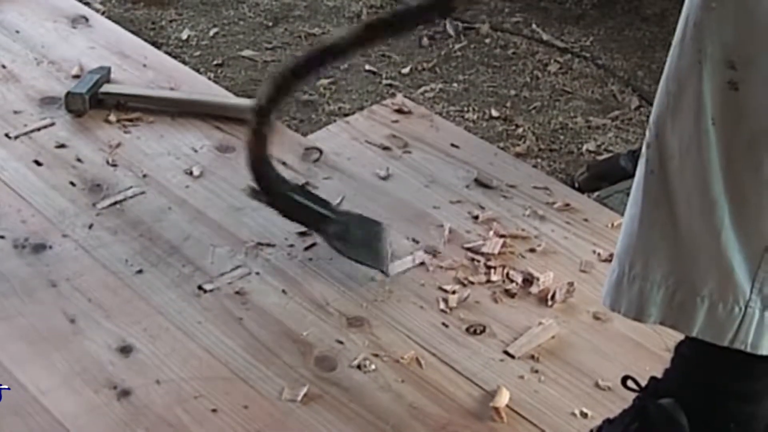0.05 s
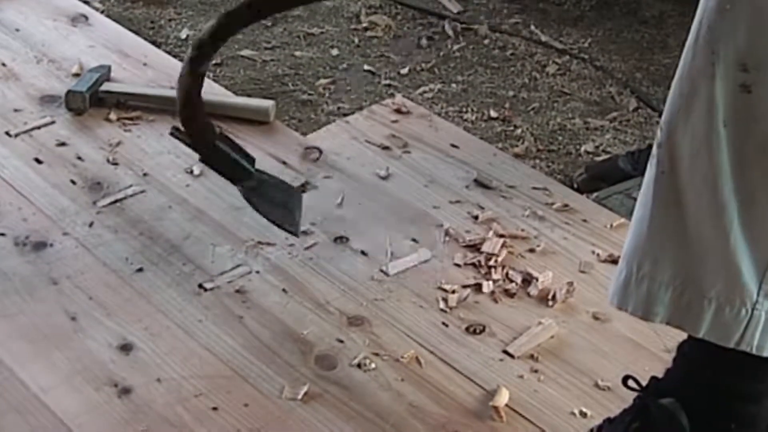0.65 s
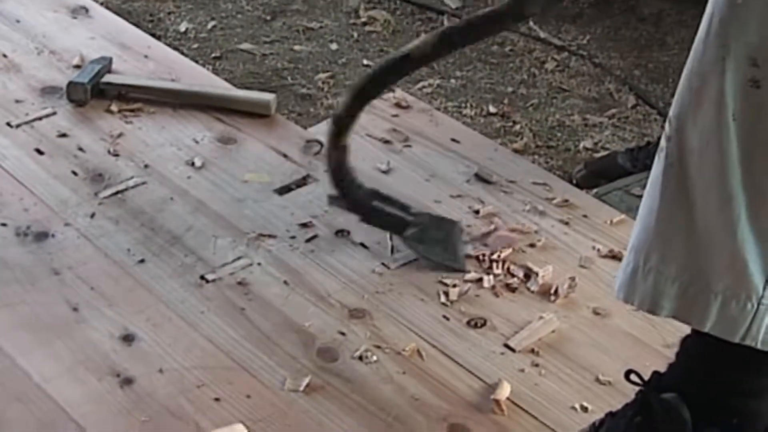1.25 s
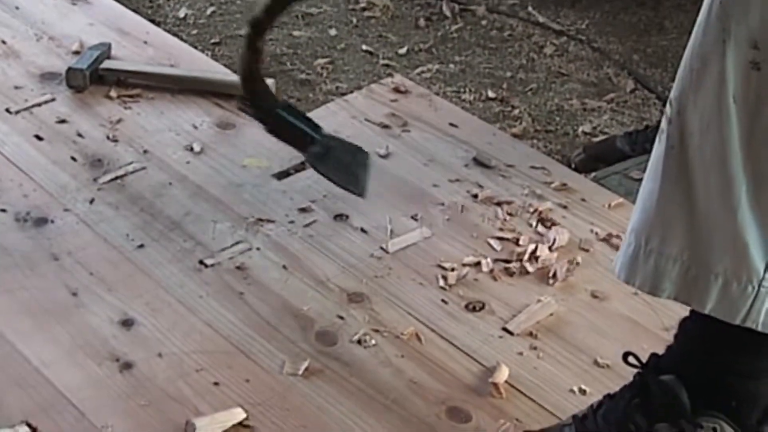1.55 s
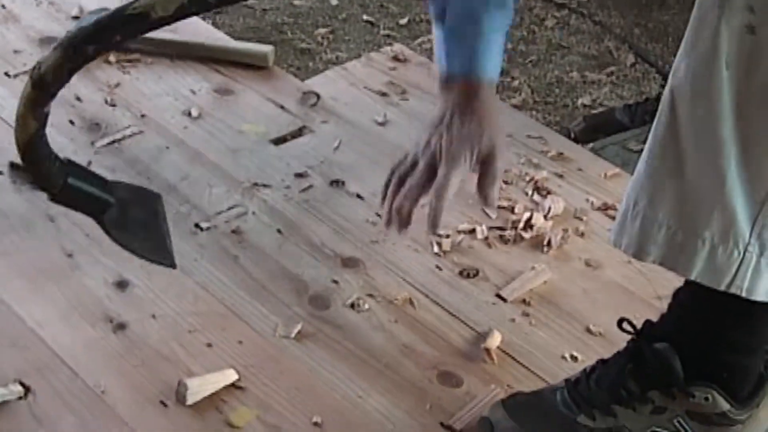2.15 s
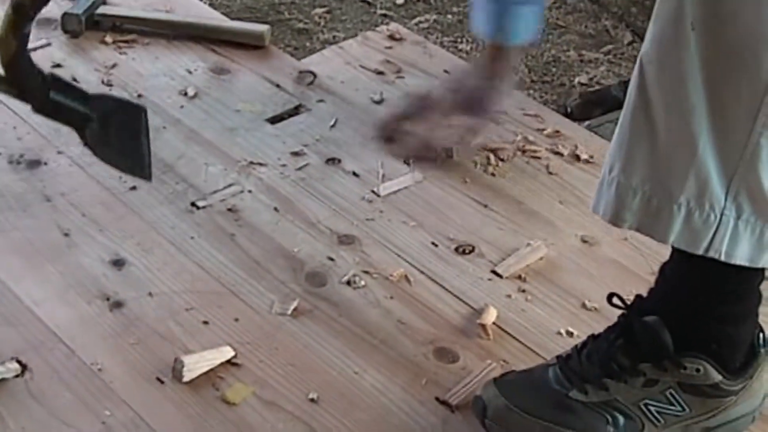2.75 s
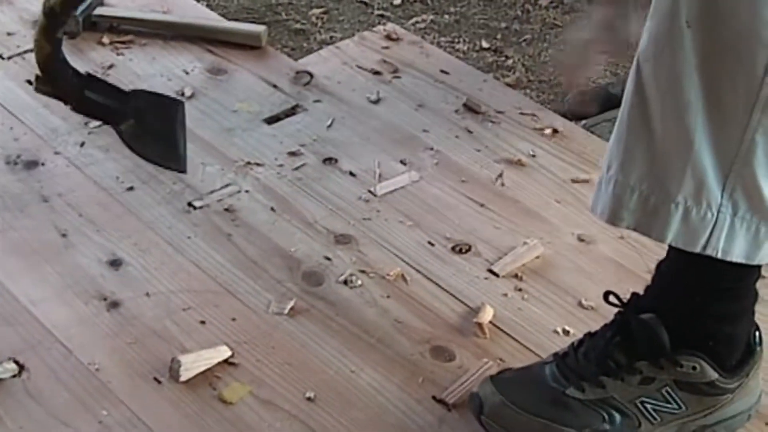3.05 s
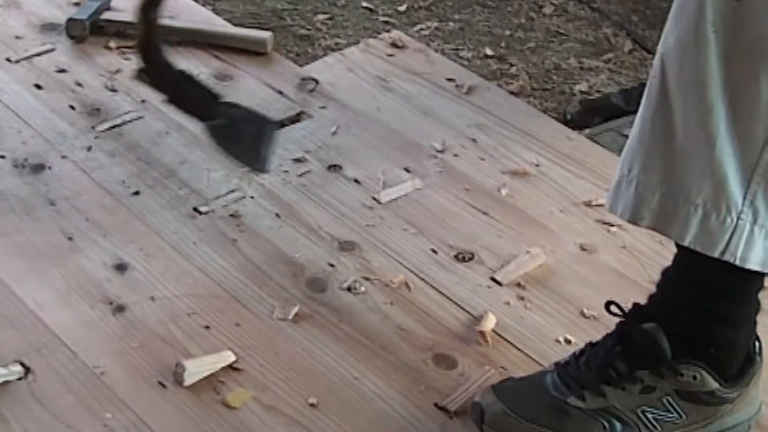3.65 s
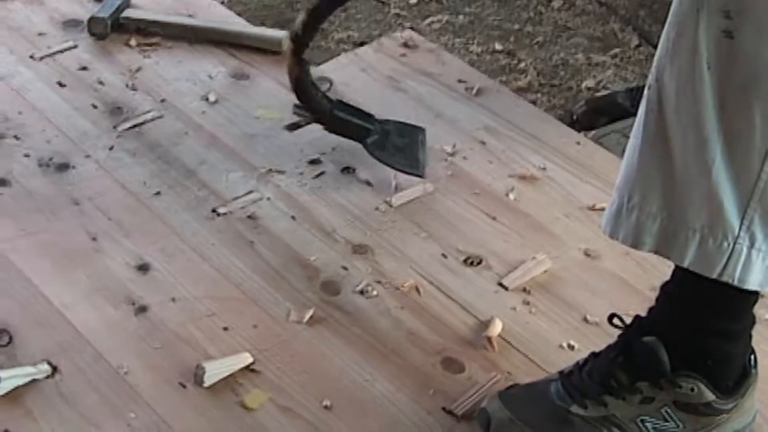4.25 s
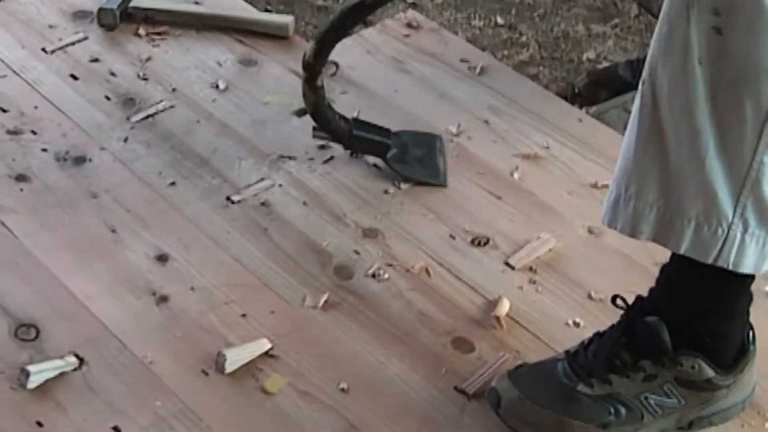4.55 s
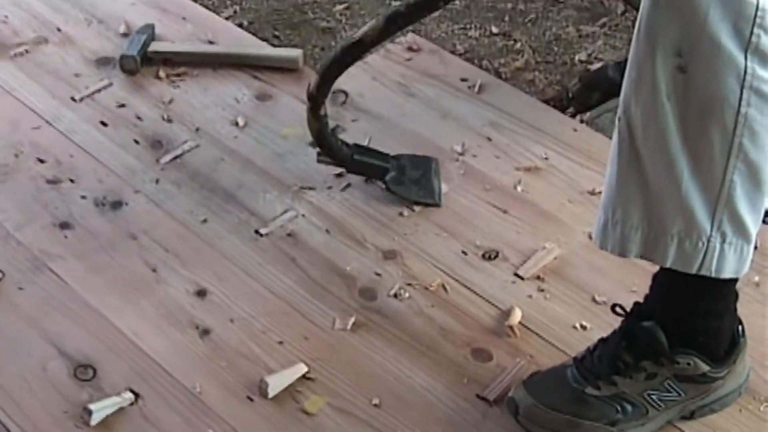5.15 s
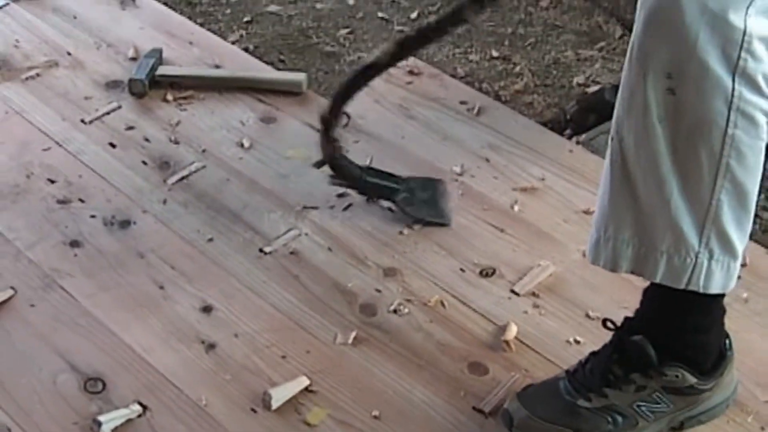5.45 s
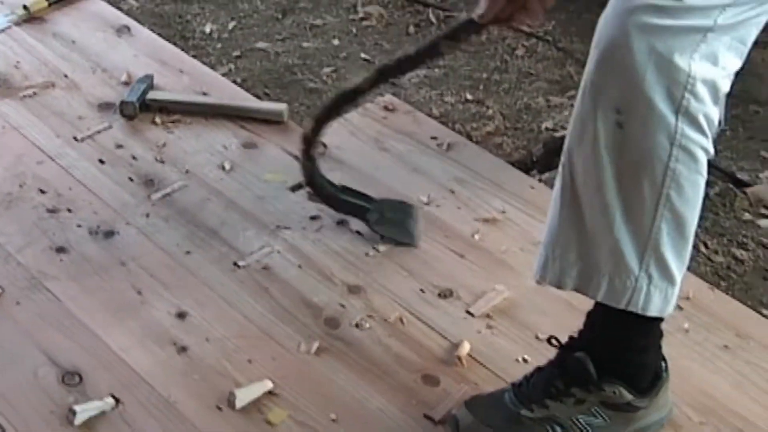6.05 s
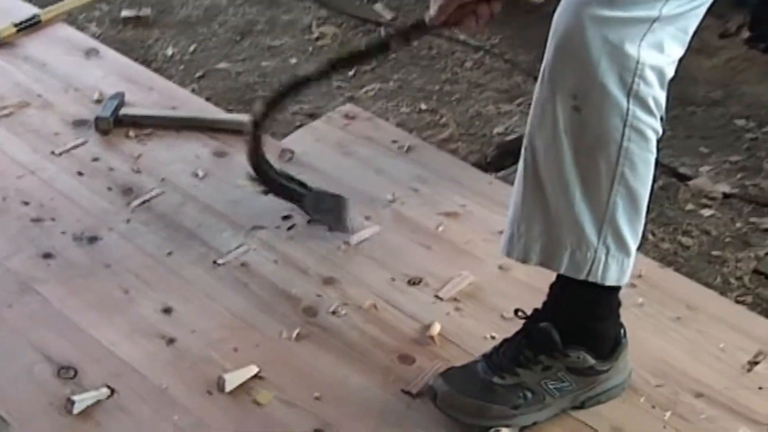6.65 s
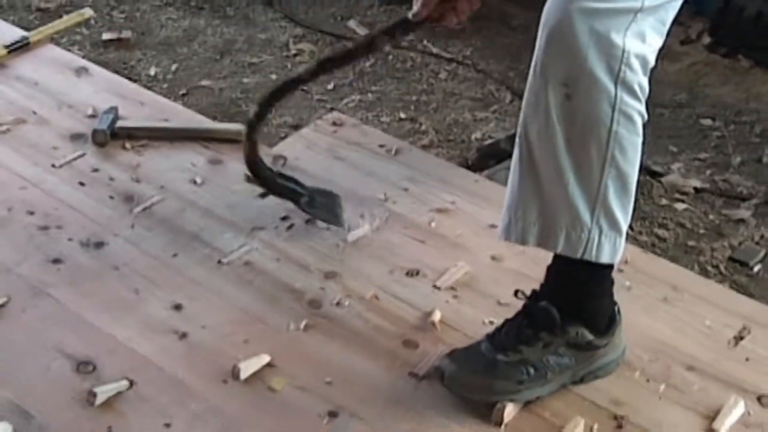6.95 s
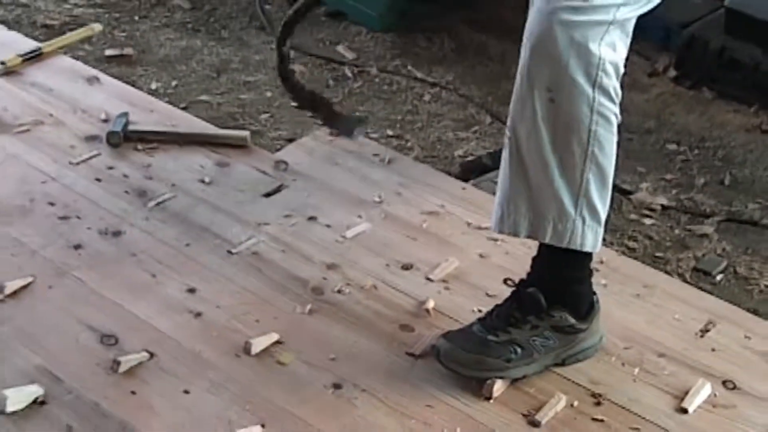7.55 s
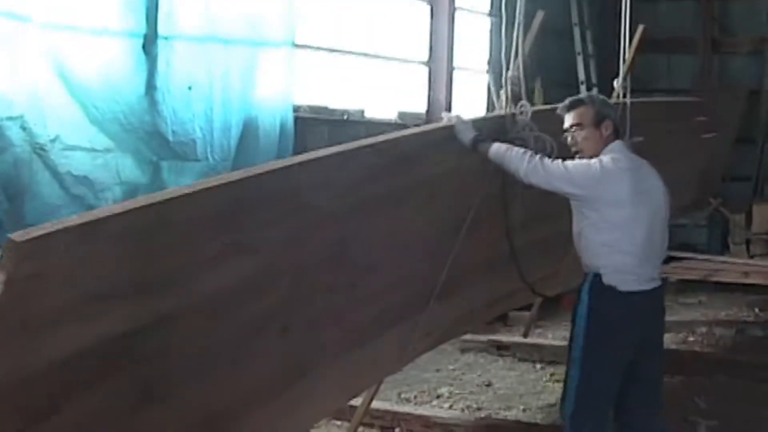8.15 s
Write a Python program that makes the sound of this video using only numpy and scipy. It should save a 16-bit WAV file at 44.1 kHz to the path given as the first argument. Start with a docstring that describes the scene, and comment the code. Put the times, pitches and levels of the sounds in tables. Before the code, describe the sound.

An adze chops a plank deck close to a stereo microphone in a big wooden shed. Each blow cracks fibres and thumps the ringing boards, often followed by a lighter clack as the blade drops back. After a few blows, a hand sweeps chips away while someone knocks on timber further off. Five more blows and a sharp knock follow, then the sound switches to a low drone with one scraping swish.

```python
"""A big wooden boat shed, a stereo microphone near a deck of planks being chopped with an adze.
Each blow snaps fibres and thumps the boards, the blade drops back on them, and the shed rings on.
In a pause a hand sweeps the chips away; further off, someone knocks on timber.
Clothes rustle over a faint room tone. At the end the scene cuts to another place:
a steady drone and one scraping swish, a tool rubbing along a hull plank."""
import sys
import numpy as np
from scipy import signal
from scipy.fft import rfft, irfft, next_fast_len
from scipy.io import wavfile

SR = 44100
rng = np.random.default_rng(int(sys.argv[2]) if len(sys.argv) > 2 else 0)


def master_out(mix):
    """Clip the mix to full scale and print it as 16-bit PCM to the path in sys.argv[1]."""
    frames = np.transpose(np.atleast_2d(mix))
    ceiling = np.clip(frames, -1, 1)
    pcm = np.round(ceiling * 32767).astype(np.int16)
    wavfile.write(sys.argv[1], SR, pcm)


N = 366471
TIME = np.arange(N) / SR

# adze blows: start_s, thump_db, contact_ms, crack_db, snap_db, boom_db, bright_db, ping_db
BLOWS = [(-0.13, 0, 1.0, -14, -7, -16, -3.5, -6), (0.3206, -1.5, 1.7, -12, -10.5, -15.5, -5.5, -12),
         (0.786, -6.5, 0.35, -14.5, -8.5, -14, 2, -16), (1.2480, -2.5, 0.81, -20, -12.5, -15, -9.5, -15),
         (5.4750, -2.5, 1.59, -19.5, -21.5, -20.5, -11.5, -19),
         (5.9159, -3.5, 1.2, -23, -24.5, -17.5, -9.5, -33), (6.3129, -2, 1.38, -25.5, -28.5, -18, -10, -38),
         (6.7125, -1.5, 0.41, -6.5, -19.5, -13, 0.5, -29), (7.1618, -6, 1.6, -4.5, -25.5, -15, 2, -33)]
# blade dropping back, or a palm landing: start_s, thump_db, contact_ms, clack_db, boom_db
LIGHT_CONTACTS = [(0.357, -11.5, 1.5, -19.5, -25.5), (0.44, -7, 2.5, -23, -34),
                  (0.895, 1.5, 1.85, -19, -18), (1.337, -5.5, 0.71, -19, -28.5),
                  (1.345, -0.5, 0.6, -12.5, -24.5), (2.374, -25, 0.86, -21, -31),
                  (2.829, -38, 3.4, -36.5, -39), (3.277, -38, 0.98, -37.5, -40.5),
                  (5.547, -9, 0.73, -20, -29), (6.029, -16, 1.1, -24, -41), (6.806, -7.5, 0.29, -16, -39),
                  (7.257, -7, 1.2, -20, -27.5)]
# larger chips landing and snapping: start_s, tick_db, rattle_db
CHIP_FALLS = [(0.407, -14, -17), (0.6027, -21, -25), (1.6148, -21.5, -33), (2.627, -18.5, -28),
              (2.865, -11.5, -17.5), (3.2164, -29.5, -46), (3.441, -20, -36), (3.6445, -24, -35),
              (3.671, -19, -28.5), (4.0453, -23.5, -33), (4.8635, -34, -37)]
# shavings peeling off and skittering: start_s, length_s, level_db
SHAVING_SLIDES = [(0.387, 0.16, -33), (1.325, 0.073, -32), (2.599, 0.086, -27), (3.677, 0.14, -45),
                  (5.544, 0.034, -37), (5.992, 0.28, -34), (6.185, 0.25, -70), (6.785, 0.065, -39)]
# hand strokes through the chips: fastest_s, length_s, hiss_db, rub_db
HAND_STROKES = [(2.361, 0.23, -29.5, -41.5), (2.843, 0.21, -35, -48), (3.379, 0.26, -35, -48.5)]
# knocks across the shed: start_s, level_db, tilt_db_per_octave, dull_hz, direct_db, echo_db, pitches_hz
FAR_KNOCKS = [(1.669, -31.5, -1.5, 1500, 0, -1.5, (740, 1000, 1325)),
              (2.061, -24.5, -1.5, 3800, -5, -0.5, (422, 483, 670, 873, 1177, 1575)),
              (4.428, -27.5, -3, 2960, 0.5, 3.5, (554, 715, 838, 892, 1090, 1685)),
              (4.721, -28, -1.5, 4500, 1, 4, (613, 697, 1119, 1275, 1557)),
              (7.378, -15, 5, 8000, -1.5, -18, (623, 932, 1060, 1157, 1248, 1356))]
# trousers and shoes: start_s, length_s, swish_db, rustle_db, scuff_db
STANCE_SHIFTS = [(1.299, 1, -57.5, -68, -64), (3.615, 0.21, -59, -66, -49.5), (3.721, 0.75, -57, -74, -66),
                 (4.199, 0.29, -61, -57.5, -79), (5.001, 0.39, -65, -55.5, -75),
                 (6.621, 0.23, -76, -73, -45.5), (6.979, 0.16, -62, -54, -45)]
# thin, far whistles: start_s, length_s, pitch_hz, level_db
FAR_WHISTLES = [(1.075, 0.077, 5170, -63), (7.786, 0.078, 5300, -60)]

# modes of the flexing boards and the steel blade: pitch_hz, level_db, t60_s
BOARD_MODES = [(470, 4.5, 0.0032), (218, -5, 0.028), (640, -5.5, 0.015), (142, -16, 0.081),
               (1110, -35, 0.0099)]
BLADE_MODES = [(3850, -33, 0.39), (6400, -29.5, 0.33), (6360, -31, .22), (7800, -38, 0.13),
               (9920, -33, .12)]
# lasting resonances of the deck: pitch_hz, width_hz, lift_db
DECK_PEAKS = [(225, 35, 8), (286.2, 10.4, 11.5), (408, 7.3, 4.5), (497, 23, -2.5), (561, 27, 7),
              (614, 86, 2), (780, 23, 1), (858, 4.5, 5), (1110, 19, 4.5), (1590, 24, 1), (2390, 46, -22),
              (3000, 140, 8), (3800, 150, 7)]
# decay of deck and shed together: band_hz, t60_s
SHED_DECAY = [(90, 1.16), (220, 1.054), (560, 1.18), (1400, 0.93), (3500, 0.69), (8000, 0.47),
              (16000, 0.55)]
# stereo width at the microphone: band_hz, side_minus_mid_db
STEREO_WIDTH = [(30, -10), (70, -23), (170, -55), (350, -37.5), (700, -23.5), (1400, -17), (2800, -12),
                (5600, -9.5), (9000, -3), (14000, 10.5)]

# noise spectra at the microphone: frequency_hz, density_db
DECK_BOOM = [(30, -33), (65, -32), (90, -5.5), (130, -5.5), (230, -4), (340, -6.5), (480, -3), (640, -8),
             (850, -7.5), (1200, -16), (2000, -25.5), (3500, -40.5), (5000, -42), (16000, -69)]
WOOD_CRACK = [(300, -23), (800, 10.5), (1400, 2), (2500, -2), (4000, -18), (5000, -21), (16000, -46)]
FIBRE_SNAP = [(1000, -3.5), (3000, -1), (4200, -5), (4900, -11), (6400, 1), (8200, 2.5), (10000, -5.5),
              (12000, -16), (16000, -21.5)]
HOLLOW_CLACK = [(100, -18), (350, -23), (560, 14.5), (720, -5), (1000, -7.5), (1600, -18), (3000, -31),
                (5000, -39), (16000, -46)]
CHIP_BRUSH = [(710, -26), (1200, -22), (1430, -10), (1770, -6.5), (2230, -5.5), (2530, -9.5), (4040, -3.5),
              (4600, -8.5), (6370, -1), (7820, 0.5), (10300, -5), (16000, -24.5)]
HULL_DRONE = [(29, -34), (50, 6), (70, -20), (140, 4.5), (211, -4.5), (318, 3), (411, -1.5), (497, 2.5),
              (775, -1), (844, -0.5), (1650, -11), (2530, -24), (2800, -39), (3000, -46), (3900, -52),
              (6600, -120)]
TOOL_SCRAPE = [(1180, -4.5), (2000, 0), (4010, -1.5), (4450, -10), (4820, -8), (6040, -13.5), (9490, -11),
               (14800, -39), (15600, -40), (16000, -85)]
TIMBER_KNOCK = [(40, -13.5), (100, -1.5), (250, 0.5), (400, 0), (580, 2), (850, 1.5), (1050, -2),
                (1300, -4), (2000, -8), (3500, -19.5), (5000, -34), (9000, -40), (16000, -83)]
CLOTH_RUSTLE = [(700, -8), (2000, -1), (3000, -1), (4000, 6), (4800, -10), (7000, -11), (10000, -13),
                (14000, -17), (16000, -21)]
SOFT_HISS = [(1500, -22), (2800, -6), (4100, 2.5), (4700, -12), (6000, -3), (8300, 0), (10000, -4.5),
             (12500, -11), (16000, -29)]
ROOM_HUM = [(18, -14), (30, -3), (80, -2), (249, -3.5), (277, 2.5), (327, -3.5), (468, -4), (509, -3),
            (995, -10), (1080, -8), (1360, -11.5), (2780, -16.5), (4500, -23.5), (5850, -21.5),
            (9900, -120)]


def adze(size=65536, bite_lead_s=0.0024, bass_start_db=3.5, bass_db_per_s=-1.1):
    """Near the microphone: the edge bites, fibres snap, boards thump, steel pings, the shed answers."""
    out, t = np.zeros((2, N)), TIME[:size]
    same_spot = rng.standard_normal((2, size))  # blows land close together and share much of their ring
    for s, thump_db, contact_ms, crack_db, snap_db, boom_db, bright_db, ping_db in BLOWS:
        add(out, s - bite_lead_s, from_db(snap_db - 17) * burst(FIBRE_SNAP, t60=0.017, width_db=3))
        add(out, s, from_db(thump_db + 5.5) * thump(contact_ms))
        add(out, s, from_db(crack_db) * burst(WOOD_CRACK, t60=0.035, width_db=-6.5))
        add(out, s, from_db(snap_db) * burst(FIBRE_SNAP, t60=0.015, width_db=-5, rise_s=0.0001))
        ping = sum(from_db(db + rng.normal(0, 1)) * np.sin(2 * np.pi * hz * t) * fade(t, t60)
                   for hz, db, t60 in BLADE_MODES)
        add(out, s, from_db(ping_db) * ping)
        bass_db = bass_start_db + bass_db_per_s * s  # less deep as the work moves along the deck
        add(out, s, from_db(boom_db) * boom(bright_db, build_s=0.0012, common=same_spot, bass_db=bass_db))
        wash = noise(FIBRE_SNAP, size, grain_db=4.5) * fade(t, 0.49)  # treble returned by the shed
        add(out, s, from_db(0.87 * snap_db - 28) * wash)
    return out


def thump(contact_ms, return_s=0.00433, return_db=-1.5):
    """A half-sine push bends the boards; the bending wave comes back once from their far edge."""
    t = TIME[:8192]
    push = np.sin(np.pi * np.minimum(t * 1000 / contact_ms, 1))
    modes = sum((-1) ** k * from_db(db) * np.sin(2 * np.pi * hz * t) * fade(t, t60)
                for k, (hz, db, t60) in enumerate(BOARD_MODES))
    flex = signal.fftconvolve(push / push.sum(), modes)[:len(t)]
    return flex + from_db(return_db) * np.interp(t - return_s, t, flex, left=0)


def boom(bright_db, build_s, common=0, bass_db=0, bright_hz=900, bass_hz=126):
    """The whole deck rings on in the shed; a harder blow wakes more of its upper modes."""
    def colour(hz):
        treble_shelf = bright_db * hz ** 4 / (hz ** 4 + bright_hz ** 4)
        bass_shelf = bass_db / (1 + (hz / bass_hz) ** 4)
        return resonances(DECK_PEAKS, hz) + treble_shelf + bass_shelf
    ring = shed_ring(DECK_BOOM, colour, common)
    return ring * (1 - np.exp(-TIME[:ring.shape[1]] / build_s))


def bumps():
    """Blade or palm lands lightly on the deck: a small thump, a hollow clack and a brief ring."""
    out = np.zeros((2, N))
    for s, thump_db, contact_ms, clack_db, boom_db in LIGHT_CONTACTS:
        add(out, s, from_db(thump_db - 1) * thump(contact_ms))
        add(out, s, from_db(clack_db) * burst(HOLLOW_CLACK, t60=0.13, width_db=-18, rise_s=0.00051))
        ring = boom(bright_db=-15, build_s=0.00077)
        add(out, s, from_db(boom_db) * ring * fade(TIME[:ring.shape[1]], 1.0))
    return out


def chips():
    """Single chips tick on the deck; shavings rustle and slide to rest."""
    out = np.zeros((2, N))
    for s, tick_db, rattle_db in CHIP_FALLS:
        add(out, s, from_db(tick_db - 10) * burst(FIBRE_SNAP, t60=0.017, width_db=-6, grain_db=5.5))
        add(out, s, from_db(rattle_db - 15) * burst(FIBRE_SNAP, t60=0.097, width_db=-1, grain_db=3.5))
    for s, length, db in SHAVING_SLIDES:
        t = TIME[:int(2 * length * SR)]
        slide = fade(t, 2 * length, rise_s=0.18 * length)
        add(out, s, from_db(db - 1.5) * noise(CHIP_BRUSH, len(t), grain_db=3.5) * slide)
    return out


def hand_sweep(catch_db=2.5, catches_per_s=140, ticks_per_s=90, press_lag_s=0.031):
    """A palm drags dry chips over the grain; they catch and slip above a dull rub, then tumble to rest."""
    hiss = sum(from_db(db) * stroke(s, length) for s, length, db, _ in HAND_STROKES)
    rub = sum(from_db(db) * stroke(s + press_lag_s, length) for s, length, _, db in HAND_STROKES)
    tumbling = sum(from_db(db - 15.5) * fade(TIME - s, t60=1.66) for s, _, db, _ in HAND_STROKES)
    landings = (rng.random(N) < ticks_per_s / SR) * rng.random(N)
    tick = fade(TIME[:4096], 0.015) + from_db(-12) * fade(TIME[:4096], 0.17)
    ticks = rms_one(signal.fftconvolve(landings, tick)[:N])
    moments = np.arange(0, TIME[-1], 1 / catches_per_s)
    grip = np.interp(TIME, moments, rng.standard_normal(N)[:len(moments)])
    catching = rms_one(from_db(catch_db * grip))
    crackle = np.hypot(catching * hiss, tumbling * ticks) * noise(CHIP_BRUSH, grain_db=2.5)
    return crackle + catching * rub * noise(WOOD_CRACK, grain_db=3)


def hull_rub(cut_s=7.745, rise_s=0.025, push_s=8.22, push_length_s=0.22, plank_lag_s=0.068):
    """Another place, after the cut: a rubbed plank drones steadily, with one scraping swish."""
    fade_in = 1 - np.exp(-np.maximum(TIME - cut_s, 0) / rise_s)
    drone = from_db(-32.5) + from_db(-38) * stroke(push_s + plank_lag_s, push_length_s)
    hiss = from_db(-49.5) + from_db(-38) * stroke(push_s, push_length_s)
    return fade_in * (drone * noise(HULL_DRONE) + hiss * noise(TOOL_SCRAPE, grain_db=3.5))


def far_knocks(echo_s=0.02, rise_s=0.0008, build_s=0.042, peak_width_hz=34, peak_db=12):
    """Across the shed, timber rings at its own pitches: heard direct, off a wall, then filling the room."""
    out = np.zeros((2, N))
    for s, db, tilt_db, dull_hz, direct_db, echo_db, pitches in FAR_KNOCKS:
        def colour(hz):
            dulling = 10 * np.log10(1 + (hz / dull_hz) ** 4)
            tilt = tilt_db * np.log2(np.clip(hz, 300, 6000) / 1000)
            return tilt - dulling + resonances([(pitch, peak_width_hz, peak_db) for pitch in pitches], hz)
        ring = shed_ring(TIMBER_KNOCK, colour)
        t = TIME[:ring.shape[1]]
        direct = from_db(direct_db) * fade(t, 0.13, rise_s)
        reflection = from_db(echo_db) * fade(t - echo_s, 0.21, rise_s)
        room = 1 - np.exp(-t / build_s)
        modes = sum(np.sin(2 * np.pi * (hz * t + rng.random())) for hz in pitches) / np.sqrt(len(pitches))
        clack = fade(t, 0.071, rise_s) + from_db(5) * fade(t - echo_s, 0.3, rise_s)
        add(out, s, from_db(db) * (ring * (direct + reflection + room) + from_db(-12.5) * modes * clack))
    return out * from_db([[-0.35], [0.35]])  # a little to the right


def stance_shifts():
    """The worker shifts his stance: trousers swish and rustle, shoes scuff the boards."""
    out = np.zeros((2, N))
    for s, length, swish_db, rustle_db, scuff_db in STANCE_SHIFTS:
        swell = arch(length)
        swish = from_db(swish_db) * noise(SOFT_HISS, len(swell), grain_db=4)
        rustle = from_db(rustle_db) * noise(CLOTH_RUSTLE, len(swell), grain_db=3.5)
        scuff = from_db(scuff_db) * noise(TIMBER_KNOCK, len(swell))
        add(out, s, swell * (swish + rustle + scuff))
    return out


def far_whistles():
    """Far from the microphone, something whistles: a faint, brief, pure tone."""
    out = np.zeros((2, N))
    for s, length, hz, db in FAR_WHISTLES:
        swell = arch(length)
        add(out, s, from_db(db) * swell ** 2 * np.sin(2 * np.pi * hz * TIME[:len(swell)]))
    return out


def shed_ring(spectrum, colour, common=0, size=65536):
    """A dense ring of boards and shed, in which the treble dies first."""
    bins = rfft(noise(spectrum, size, colour, common=common))
    hz = np.arange(size // 2 + 1) * SR / size
    centres, t60s = np.transpose(SHED_DECAY)
    bands = [np.interp(np.log(hz + 1), np.log(centres), row) for row in np.eye(len(centres))]
    return sum(irfft(bins * band) * fade(TIME[:size], t60) for band, t60 in zip(bands, t60s))


def room_tone():
    """Quiet air throughout: a faint steady hiss and a wide, low hum."""
    return from_db(-62) * noise(SOFT_HISS, grain_db=2.5) + from_db(-52) * noise(ROOM_HUM, width_db=8)


def noise(spectrum, size=N, colour=lambda hz: 0, width_db=0, grain_db=0, common=0):
    """Shaped stereo noise of unit power; grain breaks it into tiny clicks; a common part recurs."""
    padded = next_fast_len(size, True)
    hz = np.arange(padded // 2 + 1) * SR / padded
    white = rng.standard_normal((2, padded))
    grains = from_db(grain_db * np.minimum(rng.exponential(1, padded), 2 * np.pi))
    mid, side = rfft(white * grains + common) * from_db(at_hz(spectrum, hz) + colour(hz))
    side = side * from_db(at_hz(STEREO_WIDTH, hz) + width_db)
    return rms_one(irfft([mid + side, mid - side], padded)[:, :size])


def burst(spectrum, t60, width_db, grain_db=0, rise_s=0.00036, size=4096):
    """A short crackle of breaking or clicking wood."""
    return noise(spectrum, size, width_db=width_db, grain_db=grain_db) * fade(TIME[:size], t60, rise_s)


def fade(t, t60, rise_s=0.00021):
    """A rounded onset at time zero, then an exponential decay."""
    since = np.maximum(t, 0)
    return (1 - np.exp(-(since / rise_s) ** 2)) * from_db(-60 * since / t60)


def stroke(fastest_s, length_s):
    """Speed of a stroke: a bell around its fastest moment, nearly still at both ends."""
    return np.exp(-(4 * (TIME - fastest_s) / length_s) ** 2)


def arch(length_s):
    """A smooth swell and fall."""
    return np.sqrt(np.sin(np.pi * np.arange(int(length_s * SR)) / (length_s * SR)))


def resonances(peaks, hz):
    """Lift in dB from rows of pitch_hz, width_hz, lift_db."""
    return sum(db / (1 + (2 * (hz - centre) / width) ** 2) for centre, width, db in peaks)


def at_hz(points, hz):
    """Read a table on a log-frequency axis."""
    frequencies, values = np.transpose(points)
    return np.interp(np.log(hz + 1), np.log(frequencies), values)


def from_db(db):
    """Decibels to gain."""
    return 10 ** (np.asarray(db) / 20)


def rms_one(x):
    """Scale to unit power."""
    return x / np.sqrt(np.mean(x ** 2) + 1e-20)


def add(out, start_s, sound):
    """Mix a sound in at a time, cropped to the scene."""
    at = round(start_s * SR)
    first, last = max(at, 0), min(at + sound.shape[-1], N)
    if last > first:
        out[:, first:last] += sound[..., first - at:last - at]


def scene():
    """The shed, work in front and knocks behind; at the end, a cut to the drone of another place."""
    behind = room_tone() + far_knocks()
    shed = adze() + bumps() + chips() + hand_sweep() + stance_shifts() + far_whistles() + behind
    return shed + hull_rub()


def record(dry, low_cut_hz=68, ceiling=0.92, top_cut_hz=16200):
    """The microphone sheds deep rumble, the loudest peaks flatten, the top is cut."""
    lean = signal.sosfilt(signal.butter(3, low_cut_hz, "high", fs=SR, output="sos"), dry)
    rounded = lean / (1 + np.abs(lean / ceiling) ** 8) ** (1 / 8)
    return signal.sosfilt(signal.ellip(10, 0.1, 80, top_cut_hz, fs=SR, output="sos"), rounded)


dry = scene()
out = record(dry)
master_out(out)
```